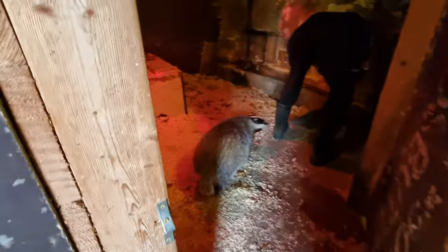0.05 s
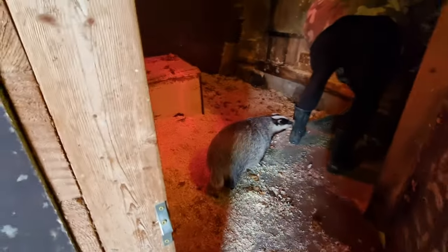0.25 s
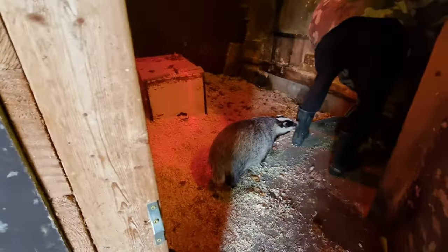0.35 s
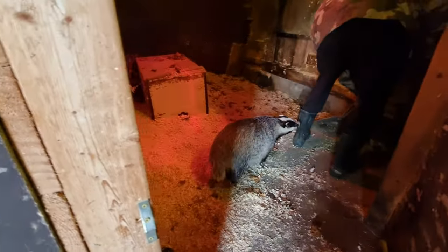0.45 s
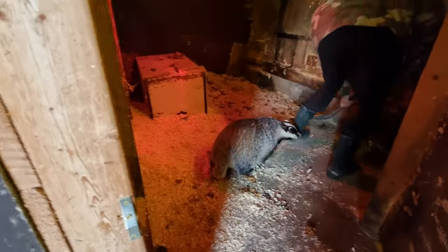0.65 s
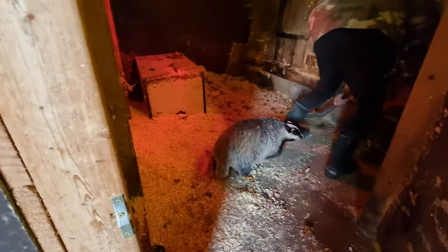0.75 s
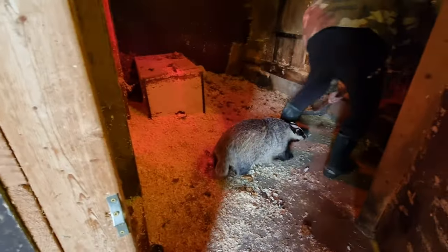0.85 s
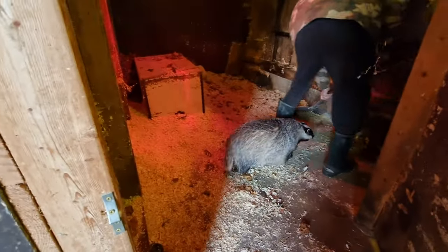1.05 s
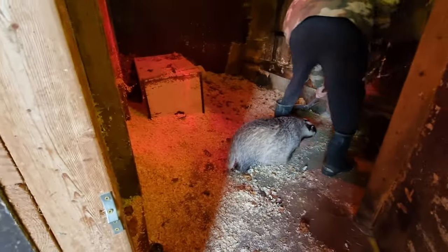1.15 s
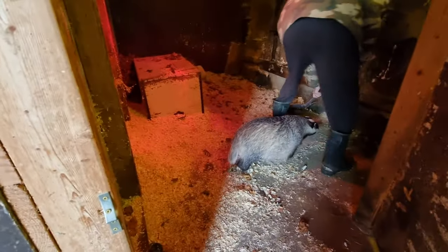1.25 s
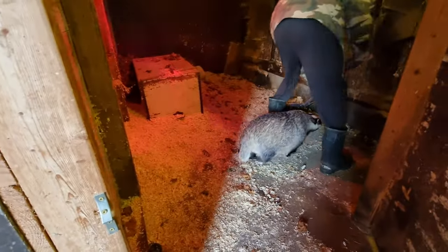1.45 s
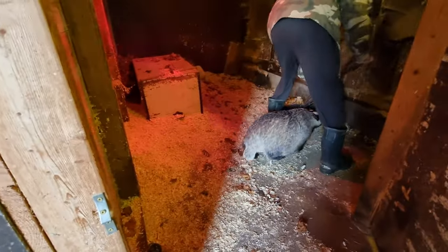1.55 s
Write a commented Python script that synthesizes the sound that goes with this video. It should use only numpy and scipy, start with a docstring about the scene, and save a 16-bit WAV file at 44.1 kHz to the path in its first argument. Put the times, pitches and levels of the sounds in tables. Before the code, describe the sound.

Something hollow and wooden scrapes over wood shavings in a small shed. It judders, then rasps, groans and squeaks as the shavings crunch and snap. Soft footfalls thud underneath, and a faint double bump ends the slide, slightly right.

```python
"""A fading wooden ring is heard first, as something hollow and wooden scrapes over shavings on a shed floor.
Friction makes the wood rasp, groan and squeak, and judder briefly as it gets going; under it the
shavings crunch in dense grains and snap. A person and an animal shift about with soft footfalls,
and a dull double bump ends the slide. The wood is a little to the right, and reflections from
the close plank walls colour the crunch and the rasp."""
import sys
import numpy as np
from scipy import signal
from scipy.fft import rfft, irfft, next_fast_len
from scipy.io import wavfile
from scipy.ndimage import uniform_filter1d, map_coordinates

SR = 44100
rng = np.random.default_rng(int(sys.argv[2]) if len(sys.argv) > 2 else 0)


def waveform_to_disk(signal):
    """Save audio, clipped to [-1, 1], as 16-bit WAV at the path in sys.argv[1]."""
    frames = np.transpose(np.atleast_2d(signal))
    scaled = np.clip(frames, -1, 1) * 32767
    samples = np.round(scaled).astype(np.int16)
    wavfile.write(sys.argv[1], SR, samples)


N = 70560


def amp(db):
    return 10 ** (np.asarray(db) / 20)


def unit(x):
    return x / np.sqrt(np.mean(x ** 2) + 1e-20)


def clock():
    return np.arange(N) / SR


def curve(rows):
    """Linear interpolation of (time_s, value) points, one value a sample."""
    return np.interp(clock(), *np.transpose(rows))


def along(points, hz):
    """Interpolation of (frequency_hz, value) points on a logarithmic axis."""
    f, v = np.transpose(points)
    return np.interp(np.log(hz + 1), np.log(f + 1), v)


def wobble(rate):
    """Smooth random modulation, rate knots a second."""
    return map_coordinates(rng.standard_normal(int(N * rate / SR) + 4), [clock() * rate])


def filtered(x, response):
    """Linear filtering: the spectrum times a complex frequency response."""
    m = next_fast_len(N + SR // 2)
    return irfft(rfft(x, m) * response(np.fft.rfftfreq(m, 1 / SR)), m)[..., :N]


def coloured(x, colour):
    """Spectral shaping by (frequency_hz, gain_db) points, at rms 1."""
    return unit(filtered(x, lambda hz: amp(along(colour, hz))))


def ringing(x, modes):
    """Forced response of damped (frequency_hz, width_hz, gain_db) modes, at rms 1."""
    def response(f):
        return sum(amp(db) * 1j * f * w / (hz * hz - f * f + 1j * f * w) for hz, w, db in modes)
    return unit(filtered(x, response))


def stroke(start, length, db, attack, release):
    """Envelope with a linear rise and, after length, an exponential decay; times in seconds."""
    t = clock() - start
    return amp(db) * np.clip(t / attack, 0, 1) * np.exp(-np.maximum(t - length, 0) / release)


def grains(rate, spread_db):
    """A Poisson train of tiny slips of uneven size, along two paths."""
    size = (rng.random(N) < rate / SR) * amp(spread_db * rng.uniform(-1, 1, N))
    return unit(size * rng.uniform(-1, 1, (2, N)))


def clumps(rate, depth, limit_db=4.5):
    """Bounded amplitude modulation gathers grains into clumps."""
    return amp(limit_db * np.tanh(depth * wobble(rate)))


def tone(hz, waver, rate):
    """Random frequency modulation: a wavering tone of rms 1, along two paths."""
    phase = 2 * np.pi * np.cumsum(hz * (1 + waver * wobble(rate))) / SR
    return np.sqrt(2) * np.sin([phase, phase + np.pi / 2 + .5 * wobble(rate)])


def first_ring():
    """Free vibration: the wood is still ringing at the outset, and its modes decay exponentially."""
    # ringing modes: pitch_hz, level_db, t60_s
    partials = [(322, -42.5, 0.65), (356, -50.5, 1.2), (1360, -44, 0.55), (1420, -44, 0.71)]
    return sum(amp(db - 60 * clock() / t60) * tone(hz, waver=0.0044, rate=84)
               for hz, db, t60 in partials)


def rasp():
    """Frictional excitation: dense slips drive board modes, which trade strength as contact shifts."""
    # envelope of the rasp: time_s, level_db
    envelope = [(0.0, -49.5), (0.098, -55.5), (0.114, -43), (0.168, -51.5), (0.196, -40), (0.288, -30),
                (0.374, -33.5), (0.502, -30.5), (0.524, -26), (0.64, -26), (0.745, -24), (0.8, -30),
                (0.85, -34), (0.864, -31), (0.886, -26), (1.016, -33), (1.068, -36.5), (1.096, -33),
                (1.354, -39.5), (1.398, -50.5), (1.488, -75), (1.506, -59), (1.572, -61), (1.6, -72)]
    # spectrum of the friction noise: frequency_hz, gain_db
    colour = [(60, -52), (190, -9.5), (280, -12.5), (400, -13.5), (560, -6.5), (680, 0.5), (1400, 0.5),
              (2300, -4.5), (3500, -7.5), (8000, -28.5)]
    # board modes: frequency_hz, width_hz, gain_db
    board_modes = [(715, 50, -4), (807, 15, -2.5), (954, 51, 5.5), (1242, 52, 3), (1400, 83, 3),
                   (1717, 14, 1), (2300, 51, -0.5)]
    # deep modes of the hollow body: frequency_hz, width_hz, gain_db
    body_modes = [(353.2, 35, -1), (393.3, 7.6, -0.5), (518.5, 61, -8)]
    # envelope of the body's ring: time_s, level_db
    body_envelope = [(0.15, -50), (0.38, -33.5), (0.45, -38), (0.74, -32), (0.82, -44.5), (1.38, -42),
                     (1.46, -75)]
    # bass roll-off of the wood: frequency_hz, gain_db
    low_cut = [(60, -45), (200, -18), (320, 0)]
    slips = grains(rate=4000, spread_db=4.5) * clumps(rate=150, depth=0.32)
    level_db = curve(envelope)
    boards = unit(sum(amp(db + 2.5 * wobble(rate=14)) * ringing(slips, [(hz, width, 0)])
                      for hz, width, db in board_modes))
    body = ringing(slips, body_modes) * amp(curve(body_envelope))
    rings = filtered(boards * amp(level_db - 2.7) + body, lambda hz: amp(along(low_cut, hz)))
    return rings + coloured(shed(slips), colour) * amp(level_db + 3.5)


def groans():
    """Stick-slip oscillation: the hollow body gives a low rough tone each time it slips."""
    # slips of the body: start_s, length_s, level_db, pitch_hz
    slips = [(0, 0.19, -56, 153), (0.185, 0.18, -43, 198), (0.458, 0.078, -41.5, 166),
             (0.593, 0.096, -41.5, 152), (0.725, .06, -43.5, 180), (0.84, 0.14, -38.5, 186),
             (1.021, 0.025, -42, 183), (1.086, 0.022, -38, 195), (1.149, 0.028, -42.5, 175),
             (1.201, 0.192, -45, 184)]
    hum = sum(tone(hz, waver=.035, rate=160) * stroke(start, length, db, attack=.022, release=.012)
              for start, length, db, hz in slips)
    return hum * amp(1.5 * wobble(rate=60.6))


def room_hush():
    """Ambient noise: a faint low hush, partly coherent between left and right."""
    # spectrum of the hush: frequency_hz, gain_db
    colour = [(25, -30), (70, 7.5), (200, 1.5), (1000, -1.5), (8000, -30), (16000, -27)]
    return amp(-59) * coloured(rng.standard_normal((2, N)) + rng.standard_normal(N), colour)


def scratchy(x, depth_db=2.2):
    """Spectral modulation: each shaving caught favours its own narrow band for a moment."""
    spectra = signal.stft(x, nperseg=256)[2]
    patches = uniform_filter1d(rng.standard_normal(spectra.shape[1:]), size=3, axis=0)
    patches = uniform_filter1d(patches, size=7, axis=1)
    return signal.istft(spectra * amp(depth_db * unit(patches)), nperseg=256)[1][:, :N]


def crunch():
    """Superposition of impulses: clumps of shavings crush in grains that merge into scratchy noise."""
    # envelope of the crushing: time_s, level_db
    envelope = [(0.03, -90), (0.044, -49), (0.114, -44.5), (0.168, -53), (0.212, -35), (0.24, -46),
                (0.294, -35.5), (0.356, -44.5), (0.43, -30), (0.49, -33), (0.54, -32), (0.6, -29),
                (0.70, -22.5), (0.76, -20.5), (0.796, -34), (0.854, -30.5), (0.866, -28.5), (0.922, -31.5),
                (0.944, -28.5), (0.975, -31), (1.064, -36.5), (1.082, -27.5), (1.198, -36), (1.212, -28),
                (1.358, -34.5), (1.398, -47.5), (1.448, -46), (1.478, -62), (1.564, -57), (1.6, -66)]
    # spectrum of the crushing: frequency_hz, gain_db
    colour = [(80, -60), (400, -22), (1500, -2), (2700, -2.5), (3600, 0), (5100, -1.5), (7000, 0),
              (8600, -9.5), (11500, -12.5), (16000, -14)]
    crush = grains(rate=5000, spread_db=7.5) * clumps(rate=300, depth=.68)
    return coloured(scratchy(shed(crush)), colour) * amp(curve(envelope) + 2.5)


def dust_spray():
    """Shot noise: fine dust hisses under the first step."""
    # spectrum of the dust: frequency_hz, gain_db
    colour = [(1000, -30), (7000, -1), (12500, -7.5), (16000, 2.5)]
    hiss = coloured(grains(rate=2500, spread_db=9), colour)
    return hiss * stroke(start=0.041, length=0.086, db=-34.5, attack=0.089, release=0.016)


def footfalls():
    """Damped oscillation: feet thud on the bedded floor, the first sharply, the rest with softer onsets."""
    # steps: start_s, level_db, pitch_hz, attack_s
    steps = [(0.109, -32, 79, 0.0036), (0.268, -30.5, 87.5, 0.014), (1.26, -37, 107, 0.012),
             (1.325, -31.5, 99, 0.009)]
    thuds, t60_s = 0, 0.086
    for start, db, hz, attack in steps:
        t = np.maximum(clock() - start, 0)
        envelope = amp(db - 60 * t / t60_s) * (1 - np.exp(-t / attack))
        thuds = thuds + envelope * np.sin(2 * np.pi * hz * t)
    return thuds * amp([[-1.3], [1.3]])  # louder on the right


def chatter(modes, waver):
    """Stick-slip sustains modes unsteadily, at rms 1; each pitch wanders in proportion to its width."""
    return unit(sum(amp(db + 1.1 * wobble(rate=70)) * tone(hz, waver * width / hz, rate=81)
                    for hz, width, db in modes))


def judder():
    """Stick-slip at low speed: the wood catches and chatters on its modes as it gets going."""
    # catches: start_s, length_s, level_db
    catches = [(0.248, 0.036, -25), (0.311, 0.064, -27.5)]
    # modes they excite: frequency_hz, width_hz, gain_db
    modes = [(347, 36, 3), (467, 5.7, 0), (657, 12, -6), (775, 12, -9.5), (980, 11, -2.5), (1220, 21, -6.5),
             (1940, 24, -2), (2615, 24, -8)]
    return chatter(modes, waver=.1) * sum(stroke(*row, attack=0.0014, release=0.01) for row in catches)


def snaps():
    """Brittle fracture: a shaving breaks in a short noise burst, dull or bright."""
    # fractures: start_s, level_db, tilt_db_per_octave
    fractures = [(0.285, -22, 7), (0.398, -20, 8), (0.427, -13.5, -0.5), (0.522, -19, -11),
                 (0.551, -14, -0.5), (0.588, -9, -9), (0.629, -11, -7), (0.862, -15.5, 1), (0.93, -13.5, 6),
                 (0.943, -13, 0), (1.08, -17.5, 2), (1.212, -18, 4), (1.34, -22, 7)]
    # spectrum before the tilt: frequency_hz, gain_db
    colour = [(100, -67), (600, -20), (2400, -2.5), (3500, 6.5), (5100, -0.5), (6800, 0.5), (8600, -9.5),
              (16000, -17)]
    rise_s, t60_s, pivot_hz = 0.0017, 0.037, 3500
    splinters, cracks = grains(rate=14000, spread_db=2.5), 0
    for start, db, tilt in fractures:
        tilted = [(hz, gain + tilt * np.log2(hz / pivot_hz)) for hz, gain in colour]
        envelope = stroke(start, rise_s, db, attack=rise_s, release=t60_s / np.log(1000))
        cracks = cracks + coloured(splinters, tilted) * envelope
    return amp(-3.5) * shed(cracks)


def squeaks():
    """Self-excited vibration: as the contact shifts, one resonance after another sings briefly."""
    # singing resonances: start_s, length_s, level_db, pitch_hz
    notes = [(0.51, 0.1, -32, 1338), (0.54, 0.07, -33, 805), (0.545, 0.125, -29.5, 2010),
             (0.635, 0.045, -29.5, 922), (0.68, 0.06, -30, 2338), (0.725, 0.045, -29.5, 985),
             (0.74, 0.185, -32.5, 1461), (1.11, 0.1, -32, 1230), (1.245, 0.1, -36.5, 1230)]
    return sum(tone(hz, waver=.004, rate=120) * amp(1.6 * wobble(rate=60.5))
               * stroke(start, length, db, attack=.012, release=.012)
               for start, length, db, hz in notes)


def bumps():
    """Heavy damping: the wood settles with a dull double rub on broad modes."""
    # contacts: start_s, length_s, level_db
    contacts = [(1.499, 0.018, -47), (1.538, 0.021, -50)]
    # modes they excite: frequency_hz, width_hz, gain_db
    modes = [(386.4, 58.3, 0.5), (630, 58.6, -2), (833, 68.3, 1), (1300, 55, -9)]
    envelope = sum(stroke(*row, attack=0.0027, release=0.015) for row in contacts)
    return chatter(modes, waver=0.634) * envelope


def shed(x, t60_s=0.11, wet_db=3, crossfade_s=.3):
    """Reverberation: close plank walls add short dense reflections that change as the source moves."""
    t, wet = np.arange(SR // 4) / SR, 0
    for centre in np.arange(0, N / SR + crossfade_s, crossfade_s):
        tail = rng.standard_normal((2, len(t))) * amp(-60 * t / t60_s) * (t > .002)
        tail /= np.linalg.norm(tail, axis=1, keepdims=True)
        near = np.cos(np.pi / 2 * np.clip((clock() - centre) / crossfade_s, -1, 1))
        wet = wet + signal.fftconvolve(x * near, tail, axes=1)[:, :N]
    return (x + amp(wet_db) * wet) / np.hypot(1, amp(wet_db))


def microphones(x):
    """Path difference: two paths mix into left and right; the nearer right side leads in phase."""
    # likeness of the two sides: frequency_hz, coherence (clipped to 0..1)
    coherence = [(150, 2), (350, 0.24), (1000, 0.68), (2000, 0.3), (4000, -0.14), (12000, 0.1163)]
    # phase of left minus right: frequency_hz, phase_rad
    lead = [(100, 0), (220, -.05), (290, -.5), (330, -1.5), (420, -1.9), (500, -2.8), (1000, -2.7),
            (1450, -3.1), (2900, -3.9), (4050, -6.8), (8000, -16)]
    # level of left minus right: frequency_hz, difference_db
    balance = [(190, -3), (330, -5), (468, -14.5), (545, 1), (750, -9), (900, -2), (1400, -2.5), (2300, 0),
               (4300, -4.5), (8000, -1.7), (13000, -3.5)]
    half = np.array([[.5], [-.5]])

    def blend(hz):
        angle = np.arccos(np.clip(along(coherence, hz), 0, 1)) / 2
        return np.array([np.cos(angle), np.sin(angle)])

    def direction(hz):
        return amp(half * along(balance, hz)) * np.exp(1j * half * along(lead, hz))

    common, apart = filtered(x, blend)
    return filtered(np.array([common + apart, common - apart]), direction)


def scene():
    """Superposition: wood, shavings and dust arrive from the right, over the footfalls and the hush."""
    scrape = first_ring() + rasp() + groans() + crunch() + dust_spray()
    scrape += judder() + snaps() + squeaks() + bumps()
    return microphones(scrape) + footfalls() + room_hush()


def record(dry):
    """Band limiting: an ideal low-pass filter removes the highest treble."""
    return filtered(dry, lambda hz: hz < 16100)


dry = scene()
out = record(dry)
waveform_to_disk(out)
```